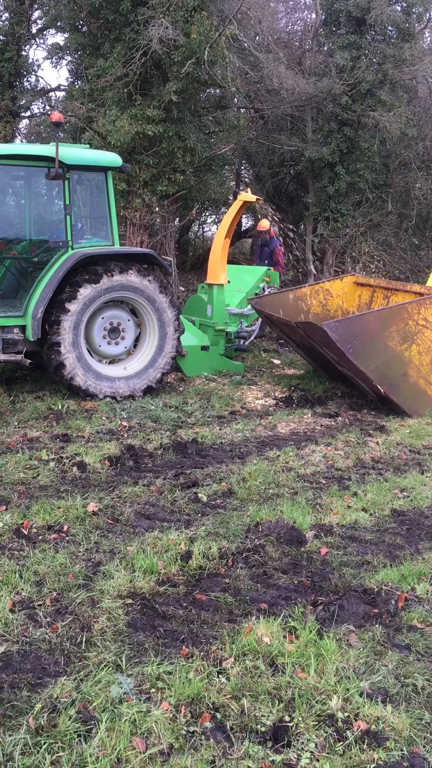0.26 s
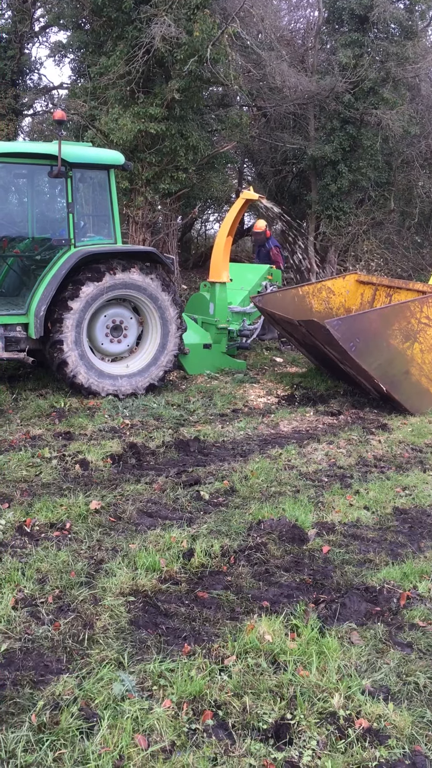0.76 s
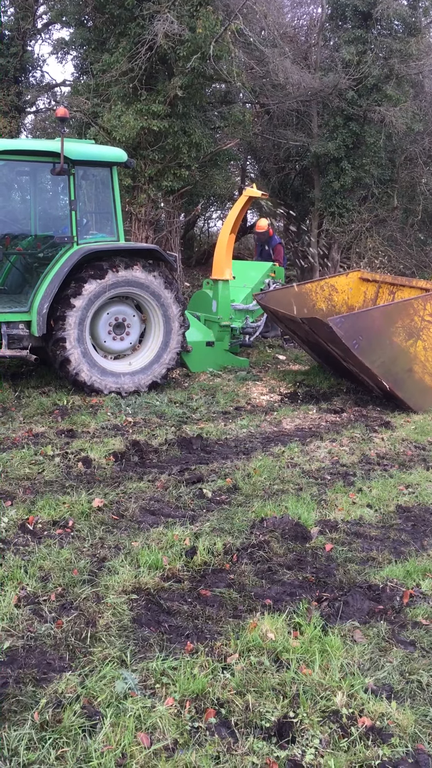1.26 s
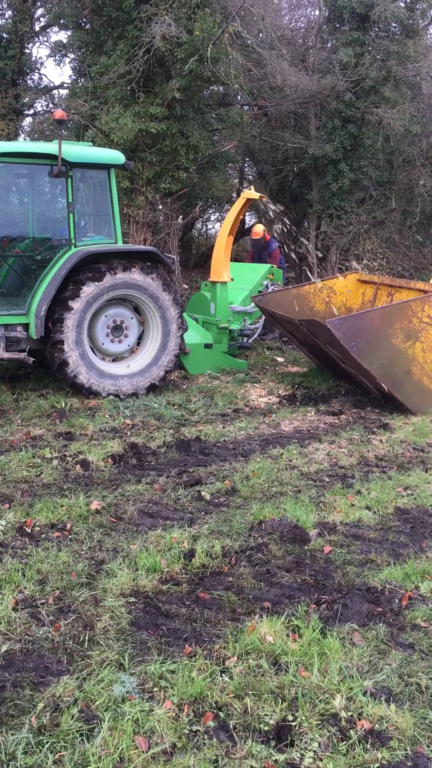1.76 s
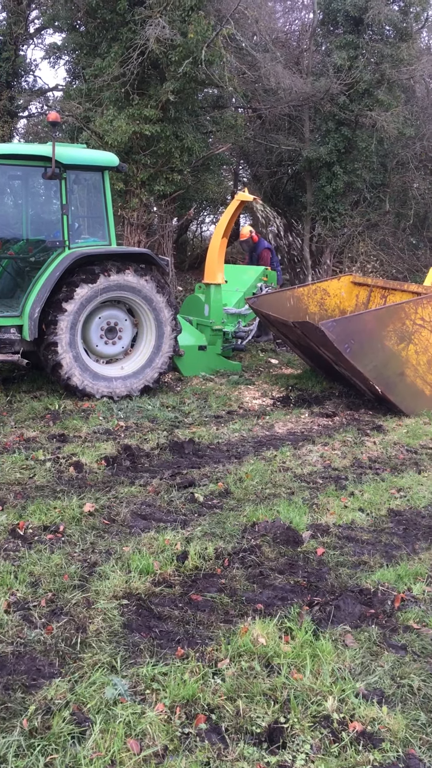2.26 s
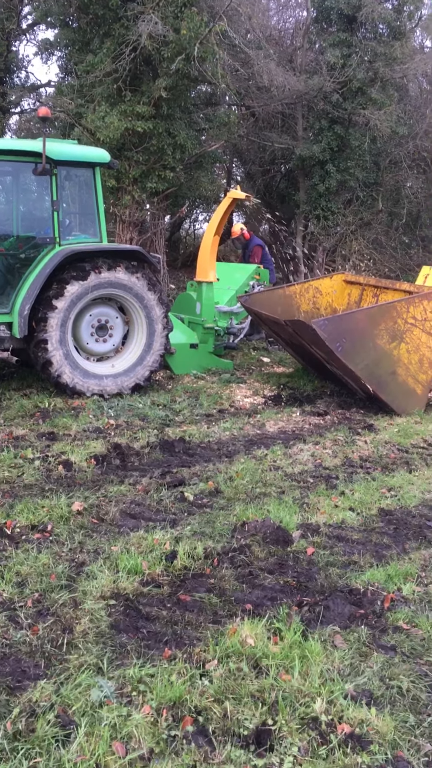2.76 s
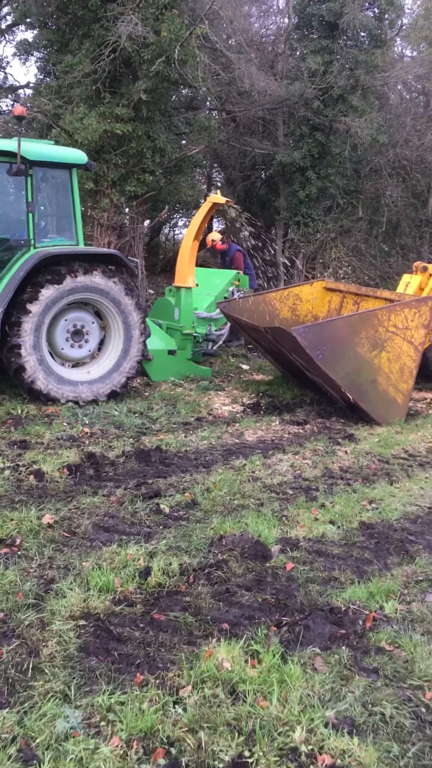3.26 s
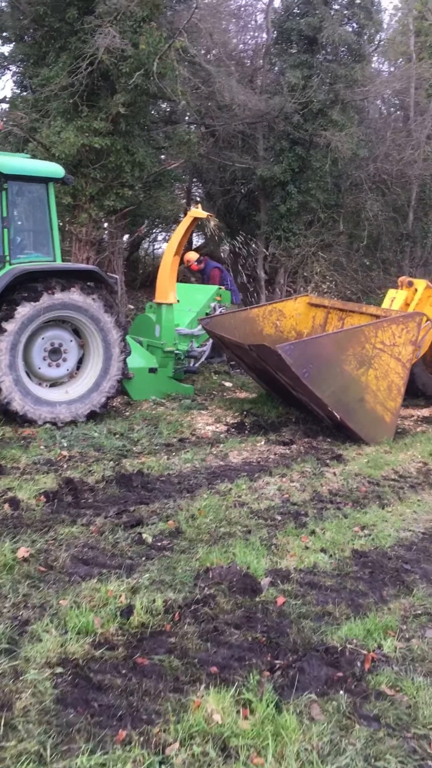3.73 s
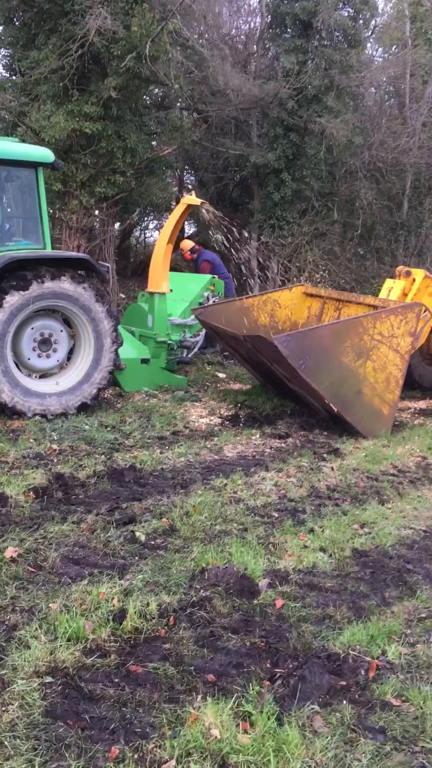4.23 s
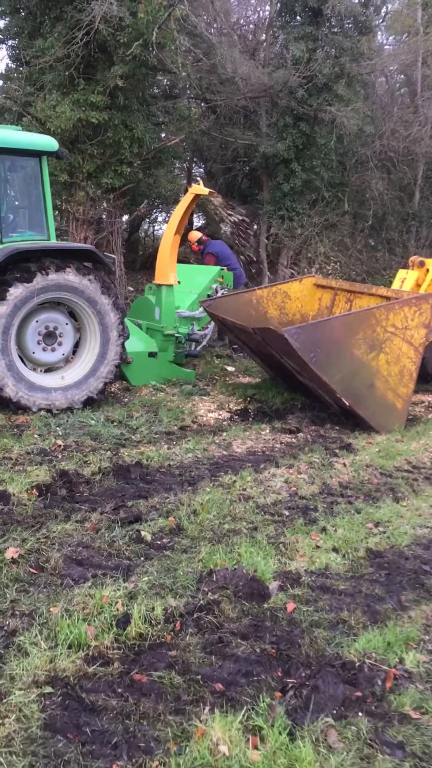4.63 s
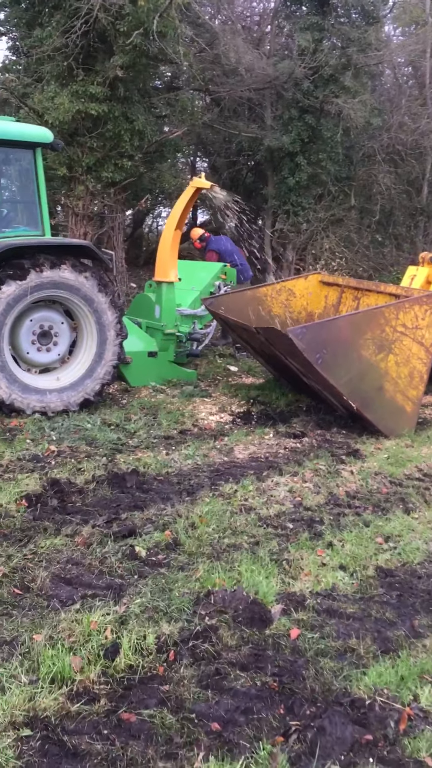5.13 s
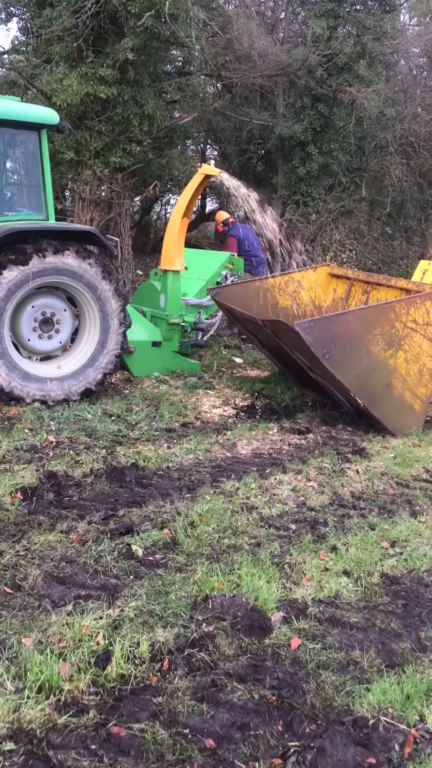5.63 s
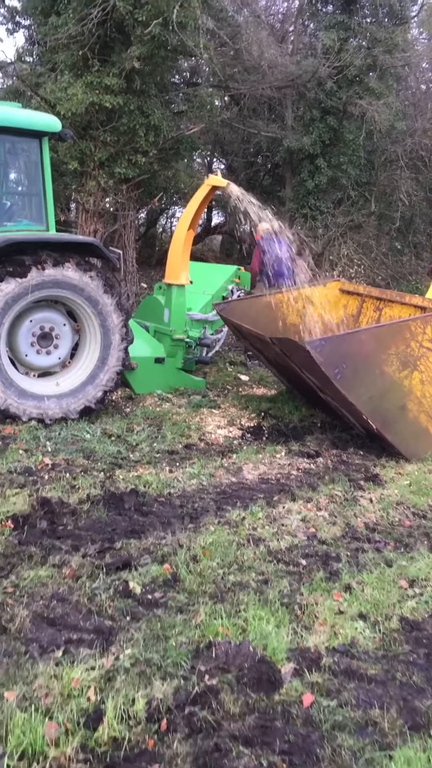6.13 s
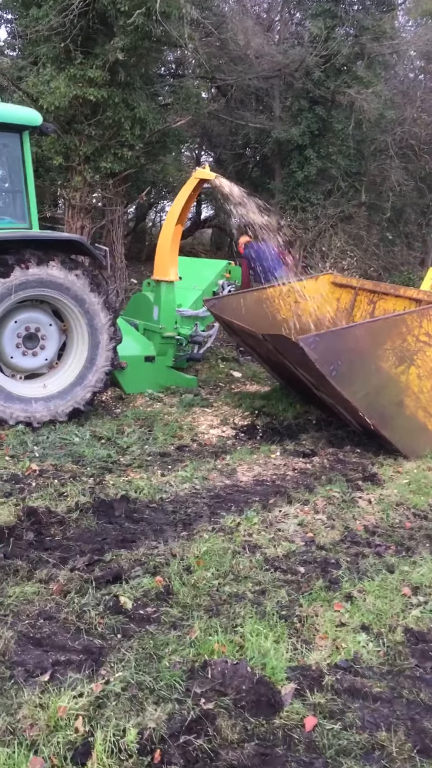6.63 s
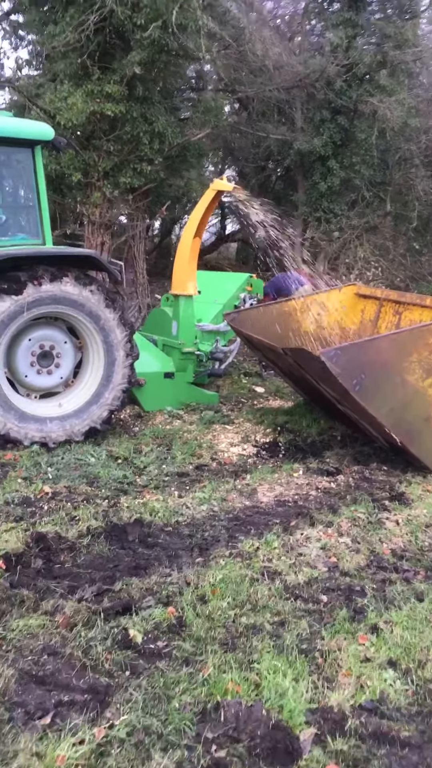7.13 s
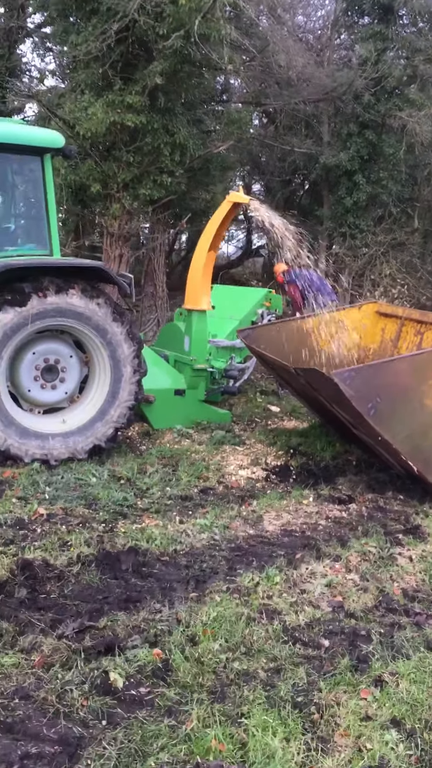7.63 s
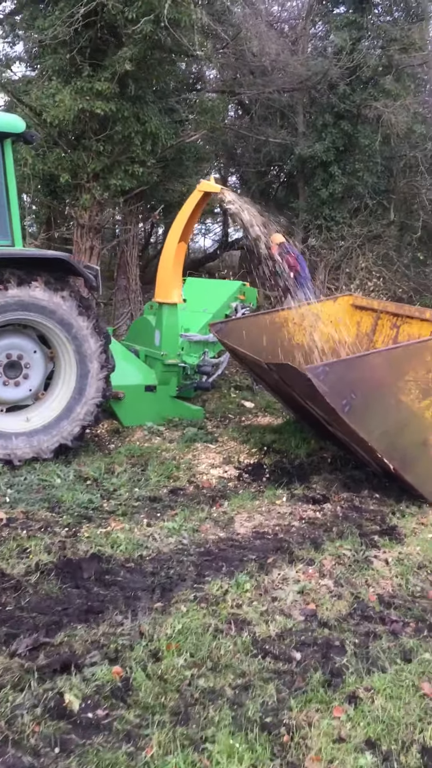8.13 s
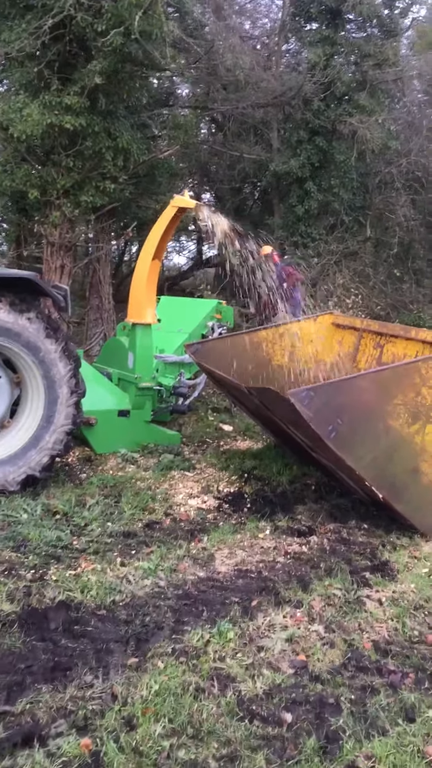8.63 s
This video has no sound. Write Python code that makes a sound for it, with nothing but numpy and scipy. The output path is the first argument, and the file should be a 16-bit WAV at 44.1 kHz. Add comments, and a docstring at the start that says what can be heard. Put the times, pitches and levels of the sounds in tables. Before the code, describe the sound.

A constant, loud diesel drone at fast working speed fills a field, heard in mono from some metres away with little echo. First come leafy hiss, dry twig cracks and a short stick being cut. In the second half, thick branches bring a rough pulsing growl, hollow housing knocks, wavering metallic whines and dense rattling spray of chips, almost unbroken until the last butt clears and the drone is left alone.

```python
"""Tractor and disc chipper

A four-cylinder diesel drives a disc chipper at almost steady speed: exhaust harmonics drone over block clatter
and the noise of turbulent air. Leaves hiss as tiny impacts, and twigs snap as decaying bursts of bright noise.
When sticks and then branches go in, the engine sags, the knives throb as pulsed noise through resonances,
thin tones sing, and showers of impacts rattle and spray through the steel chute."""
import sys
import numpy as np
from scipy import signal
from scipy.fft import rfft, irfft
from scipy.io import wavfile
from scipy.ndimage import uniform_filter1d

SR = 44100
rng = np.random.default_rng(int(sys.argv[2]) if len(sys.argv) > 2 else 0)


def waveform_to_disk(signal):
    """Save audio, clipped to [-1, 1], as 16-bit WAV at the path in sys.argv[1]."""
    frames = np.transpose(np.atleast_2d(signal))
    scaled = np.clip(frames, -1, 1) * 32767
    samples = np.round(scaled).astype(np.int16)
    wavfile.write(sys.argv[1], SR, samples)


N = 392049
TIME, BINS = np.arange(N) / SR, np.fft.rfftfreq(N, 1 / SR)  # s, Hz

FREE_HZ, LOADED_HZ = 64.731, 64.03  # firing rate running free and at full strain
KNIFE_PASSES = 2.083  # knife passes per four-stroke cycle
FLYWHEEL_S = .15  # time constant by which the speed trails the strain
BITE_S = .08  # time for the knives to bite fully into the wood, and to come clear of it
PIPE_S = .0237  # travel time of the firing waves from cylinders to listener
THROW_S = .019  # travel time of the chips out of the disc housing
EDGE_HZ = 15800  # upper band limit


def gain_of(db):
    """Level to amplitude: 20 dB is a factor of ten."""
    return 10 ** (np.asarray(db) / 20)


def evened(x):
    """Normalisation: scales a signal to rms 1."""
    return x / np.sqrt(np.mean(abs(x) ** 2) + 1e-20)


def read(points, hz):
    """Spectral envelope: gain interpolated in dB along a log-frequency axis."""
    f, db = np.transpose(points)
    return gain_of(np.interp(np.log(hz + 1), np.log(f), db))


def coloured(x, points):
    """Linear filtering: multiplies the spectrum of x by an envelope."""
    return irfft(rfft(x) * read(points, BINS), N)


def drift(hz):
    """Slow random modulation: Gaussian low-passed noise of rms 1, up to about hz."""
    lowpass = np.exp(-(BINS / hz) ** 2)
    return evened(irfft(rfft(rng.standard_normal(N)) * lowpass, N))


def strokes(turns, rise, fall, base):
    """Periodic amplitude modulation: a pulse each turn over a steady base; rise and fall in turns."""
    part = turns % 1
    shape = (1 - np.exp(-part / rise)) ** 2 * np.exp(-part / fall)
    return evened(base + shape / shape.max())


def grains(per_s, spread_db):
    """Shot noise: random tiny impacts of either sign, a few of them large."""
    size = gain_of(spread_db * np.minimum(rng.exponential(1, N), 4))
    strikes = rng.random(N) < per_s / SR
    return evened(size * rng.choice([-1, 1], N) * strikes)


def spells(rows, ramp_s):
    """Linear envelopes: each row (start, end, ..) rises, holds at 1 and falls."""
    return np.array([
        np.clip(np.minimum(TIME - start, end - TIME) / ramp_s, 0, 1) for start, end, *_ in rows
    ])


def firing_rate(strain):
    """Governor droop: speed falls in proportion to strain, smoothed by flywheel inertia."""
    keep = np.exp(-1 / (FLYWHEEL_S * SR))
    smooth_strain = signal.lfilter([1 - keep], [1, -keep], strain)
    return FREE_HZ - (FREE_HZ - LOADED_HZ) * smooth_strain


# Exhaust harmonics; every fourth is a multiple of the firing rate
# order [multiples of the four-stroke cycle], free_db [dB rms], loaded_db [dB rms]
EXHAUST_LINES = [(3, -47, -47), (4, -15.1, -15.7), (5, -45, -44), (6, -39, -37), (7, -29, -29),
                 (8, -18, -17.5), (9, -41, -43), (10, -40, -35), (11, -27.5, -31), (12, -31, -36),
                 (13, -37, -41), (14, -41, -40), (15, -35, -37), (17, -46, -45), (19, -42, -41)]


def exhaust(cycle, load, pipe_lag=.615, smear=-.0174, waver=.018, wobble=.16):
    """Harmonic synthesis: weaker waves from unequal cylinders spread over the cycle and wobble in phase."""
    # pipe_lag and smear in turns, wobble in radians rms, waver as a fraction rms
    out = np.zeros(N)
    unsteady = wobble * drift(9.2)
    for order, free_db, loaded_db in EXHAUST_LINES:
        weak = order % 4 > 0
        turns = order * cycle + pipe_lag + weak * smear * order ** 2
        angle = 2 * np.pi * turns + weak * unsteady
        out += gain_of(free_db + (loaded_db - free_db) * load) * np.cos(angle)
    return np.sqrt(2) * out * (1 + waver * drift(17.4))


# Dense comb of engine block lines, running free and under load, before each line's random strength
# frequency_hz [Hz], level_db [dB per line]
CLATTER_FREE_SPECTRUM = [(200, -51), (370, -58), (450, -48.5), (620, -42), (800, -49), (1000, -43.5),
                         (1300, -48.5), (1700, -49.5), (2200, -55.5), (3200, -58), (4500, -66)]
CLATTER_LOADED_SPECTRUM = [(200, -49), (370, -54), (470, -46.5), (620, -43.5), (800, -49), (1000, -47),
                           (1400, -45.5), (1700, -48.5), (2200, -53.5), (3200, -58.5), (4500, -66)]
# Prominent lines of block, fan and gears
# order [multiples of the four-stroke cycle], free_db [dB rms], loaded_db [dB rms]
WHINE_LINES = [(32, -42, -38), (33, -43, -37), (34, -33, -46), (39, -36, -38), (41, -36, -39),
               (42, -39, -45), (43, -39, -48), (59, -41, -45), (61, -41, -44), (64, -39, -41),
               (65, -40, -47), (68, -42, -38), (80, -46, -41), (83, -39, -48), (86, -47, -39),
               (96, -41, -46), (106, -43, -42), (115, -52, -44), (140, -44, -56)]


def clatter(cycle, knock, spectrum, whines, count=6):
    """Periodicity gives a line spectrum: knocks, valves and gears repeat one pattern each cycle."""
    size = len(knock)
    place, order = np.arange(size) / size, np.arange(size // 2 + 1)
    strength = read(spectrum, order * FREE_HZ / 4)
    strength *= np.sqrt(rng.gamma(2, 1 / 2, len(order)))
    # the exhaust sounds its own orders separately
    strength[[0, 1, 2] + [row[0] for row in EXHAUST_LINES]] = 0
    strength[[row[0] for row in WHINE_LINES]] = gain_of(whines)
    firings = strokes(4 * place, rise=0.1525, fall=0.353, base=1.188)
    # alternately impose equal loudness at each firing and the line strengths
    for _ in range(count):
        loudness = np.sqrt(uniform_filter1d(knock ** 2, size=200, mode="wrap"))
        phase = np.angle(rfft(knock / loudness * firings))
        knock = irfft(strength * np.exp(1j * phase))
    return np.interp(cycle, place, knock * size / np.sqrt(2), period=1)


# Turbulence of exhaust, cooling fan and blower
# frequency_hz [Hz], density_db [dB per Hz]
ROAR_SPECTRUM = [(22, -84), (40, -70.5), (72, -60), (120, -54.5), (185, -52), (265, -61.5), (370, -69),
                 (480, -62.5), (620, -58), (800, -63), (1200, -61), (2100, -64), (3200, -68), (5000, -76.5)]


def roar(cycle):
    """Turbulence noise: broadband air noise, modulated a little at each firing."""
    puffs = strokes(4 * cycle, rise=0.144, fall=.35, base=5.2)
    return coloured(rng.standard_normal(N) * puffs, ROAR_SPECTRUM) * np.sqrt(SR / 2)


def tumbled(x, coarse_db, patchy_db=2.5, rasp_hz=5500, rasp_width_hz=2000):
    """Time-varying filtering: clumps strike the steel with their own colour; coarse ones add a lower rasp."""
    hz, s, z = signal.stft(x, SR, nperseg=512, noverlap=384)
    patches = uniform_filter1d(rng.standard_normal(z.shape), size=6, axis=0)  # across frequency
    patches = evened(uniform_filter1d(patches, size=7, axis=1))  # across time
    rasp_band = np.exp(-((hz[:, None] - rasp_hz) / rasp_width_hz) ** 2)
    rasp = rasp_band * np.interp(s, TIME, coarse_db)
    return signal.istft(z * gain_of(patchy_db * patches + rasp), SR, nperseg=512, noverlap=384)[1][:N]


# Colours of leaf and chip impacts
# frequency_hz [Hz], relative_level_db [dB]
LEAF_SPECTRUM = [(2000, -14.5), (3500, -4), (6000, 2), (7600, -5), (9500, -2), (12500, 1), (14500, 0),
                 (15800, 0)]
CHIP_SPECTRUM = [(2000, -11), (4000, -7.5), (6200, 1.5), (7300, -2), (9200, 2.5), (11500, -1.5), (13000, 0),
                 (15800, -7)]
# Leafy sprigs drawn through the blower; levels before load, patches and gusts
# start_s [s], end_s [s], hiss_db [dB], rasp_db [dB]
SPRIG_SPELLS = [(-0.1, 0.62, -34.5, 0), (0.36, 0.53, -32, -3), (0.63, 0.86, -27.5, -3),
                (1.15, 3.1, -34.5, 0), (1.4, 1.6, -34, -2), (3.42, 4.05, -33.5, 0), (4.0, 5.0, -31, 1),
                (6.6, 7.05, -35.5, -1)]


def spray(knife, load, chip_flow, chip_rasp_db, litter_db=-33.8, sprig_ramp_s=.07, gust_db=0.69):
    """Filtered shot noise: leaves hiss through the blower; hard chips leave in a burst per knife."""
    leaf_pulse = strokes(knife, rise=0.14, fall=0.285, base=1.6)
    leaves = evened(coloured(grains(14000, spread_db=2.5), LEAF_SPECTRUM)) * leaf_pulse
    chip_pulse = strokes(knife, rise=0.162, fall=0.236, base=0.677)
    chips = evened(coloured(grains(16000, spread_db=1.9), CHIP_SPECTRUM)) * chip_pulse
    _, _, hiss_db, rasp_db = np.transpose(SPRIG_SPELLS)
    passing = spells(SPRIG_SPELLS, sprig_ramp_s)
    # litter and sprigs add in power, and give way as the load grows
    leaf_power = gain_of(litter_db) ** 2 + gain_of(hiss_db) ** 2 @ passing
    leaf_flow = np.sqrt((1 - load) * leaf_power)
    stream = leaf_flow * leaves + chip_flow * chips
    return gain_of(gust_db * drift(26)) * tumbled(stream, rasp_db @ passing + chip_rasp_db)


# Twigs snapping
# start_s [s], relative_level_db [dB], decay_s [s to -60 dB]
TWIG_SNAPS = [(.7386, -19, .04), (.793, -17, .06), (.9772, -18, .04), (1.2542, -10.5, .05),
              (1.4801, -8.5, .016), (1.4958, -20, .05)]
# Colour of a snap: frequency_hz [Hz], relative_level_db [dB]
SNAP_SPECTRUM = [(2000, -24.5), (4500, -16.5), (6000, -9), (9000, -3.5), (12500, 0.5), (15800, -0.5)]


def snaps(snap_db=2):
    """Exponential decay: each twig breaks in a bright noise burst of tearing fibres."""
    envelope = np.zeros(N)
    for s, db, t60 in TWIG_SNAPS:
        age = np.maximum(TIME - s, 0)
        envelope += (TIME >= s) * gain_of(db - 60 * age / t60)
    return gain_of(snap_db) * coloured(envelope * rng.standard_normal(N), SNAP_SPECTRUM)


# Colours of the knife blows and of chips rattling in the chute
# frequency_hz [Hz], relative_level_db [dB]
THUD_SPECTRUM = [(60, -19.5), (110, 0.5), (200, 5.5), (290, 2.5), (370, -5.5), (450, 1), (600, 0),
                 (800, -1.5), (1500, -12.5), (4000, -35)]
RATTLE_SPECTRUM = [(500, -21.5), (900, -4.5), (1400, -1.5), (2000, -2.5), (3000, -8.5), (4500, -14),
                   (8000, -30.5)]


def cutting(knife, load, rattle, thud_db=-33, hum_db=-28):
    """Periodic forcing: under load the knives thud and the paddles hum, while chips rattle in the chute."""
    pulse = strokes(knife, rise=0.077, fall=0.29, base=1.14)
    blows = evened(coloured(rng.standard_normal(N) * pulse, THUD_SPECTRUM))
    hail = evened(coloured(grains(7000, spread_db=2), RATTLE_SPECTRUM))
    hum = np.sqrt(2) * np.cos(2 * np.pi * 3 * knife)  # third harmonic of the knife rate
    return np.sqrt(load) * (gain_of(thud_db) * blows + gain_of(hum_db) * hum) + rattle * hail


# Resonances of the hopper and disc housing
# frequency_hz [Hz], width_hz [Hz], relative_level_db [dB]
HOUSING_MODES = [(285, 35, -3), (455, 55, -1), (562.7, 70, -2.5), (800, 118, 0), (1140, 146, -4)]
# Thick stretches of the branches
# start_s [s], end_s [s], boom_db [dB]
THICK_STRETCHES = [(4.85, 5.32, -33), (6.15, 6.85, -39), (7.3, 8.1, -31), (8.0, 8.55, -31.5),
                   (8.4, 9.2, -29)]


def knocking(knife, load, uneven_db=3, plain_db=-41, knot_ramp_s=.17):
    """Modal resonance: uneven knife bites excite the housing, which booms most where the wood is thick."""
    bite = np.floor(knife).astype(int)
    force = gain_of(uneven_db * np.clip(rng.standard_normal(N), -2, 2))[bite]
    pulse = strokes(knife, rise=.05, fall=0.265, base=0.335)
    blows = force * pulse * rng.standard_normal(N)
    body = sum(
        gain_of(db) / np.sqrt(width) / (1 + 1j * (BINS - hz) / width) ** 2
        for hz, width, db in HOUSING_MODES
    )
    _, _, boom_db = np.transpose(THICK_STRETCHES)
    thick_power = gain_of(boom_db) ** 2 @ spells(THICK_STRETCHES, knot_ramp_s)
    power = gain_of(plain_db) ** 2 * load + thick_power
    return np.sqrt(power) * evened(irfft(rfft(blows) * body, N))


# Thin tones that the chipper sings under load
# start_s [s], end_s [s], pitch_hz [Hz], level_db [dB rms at full swell, before flutter]
SINGING_TONES = [(5.2, 6.1, 3540, -48.5), (5.85, 6.955, 3397, -38.5), (6.83, 9.4, 3397, -42.5),
                 (6.2, 7.73, 2400, -41), (6.5, 8.2, 1450, -36.5), (7.55, 9.2, 1845, -42.5),
                 (5.1, 7.61, 1378, -39.5)]


def singing(fade=0.264, wander_hz=5, flutter=0.26):
    """Frequency and amplitude modulation: thin tones swell and fade, wavering in pitch and strength."""
    out = np.zeros(N)
    for (_, _, hz, db), swell in zip(SINGING_TONES, spells(SINGING_TONES, fade)):
        turns = np.cumsum(hz + wander_hz * drift(25.03)) / SR
        strength = gain_of(db) * np.sqrt(2 * swell) * (1 + flutter * drift(30))
        out += strength * np.sin(2 * np.pi * turns)
    return out


# Wood fed to the knives: two sticks, two branches and the butt of the last; chips_db before patches and gusts
# start_s [s], end_s [s], strain [0-1], rattle_db [dB], chips_db [dB], rasp_db [dB]
WOOD_FEED = [(2.27, 2.6, .58, -36, -39, 0), (4.03, 4.35, .2, -44, -34, 0),
             (4.92, 6.75, .98, -32.5, -26.1, 1), (6.95, 8.28, .96, -30.5, -26.2, -2.5),
             (8.2, 9.2, .95, -28.7, -27.1, -3)]


def scene():
    """Coupled rotation: one shaft turns engine and disc; wood slows it, alters its note and throws chips."""
    _, _, strains, rattle_db, chips_db, rasp_db = np.transpose(WOOD_FEED)
    feeding = spells(WOOD_FEED, BITE_S)
    strain = np.clip(strains @ feeding, 0, 1)
    load = strain ** 2
    cycle_hz = firing_rate(strain) / 4  # four firings per cycle
    cycle = np.cumsum(cycle_hz) / SR
    knife = KNIFE_PASSES * cycle

    knock = rng.standard_normal(size=2048)
    _, free_db, loaded_db = np.transpose(WHINE_LINES)
    free_block = clatter(cycle, knock, CLATTER_FREE_SPECTRUM, free_db)
    loaded_block = clatter(cycle, knock, CLATTER_LOADED_SPECTRUM, loaded_db)
    block = (1 - load) * free_block + load * loaded_block
    tractor = exhaust(cycle - PIPE_S * cycle_hz, load) + block + roar(cycle)

    rattle = gain_of(rattle_db) @ feeding
    chipper = cutting(knife, load, rattle) + knocking(knife, load) + singing()
    thrown_knife = knife - THROW_S * KNIFE_PASSES * cycle_hz
    thrown = spray(thrown_knife, load, gain_of(chips_db) @ feeding, rasp_db @ feeding)
    return (tractor + chipper + thrown + snaps())[None]


# Narrow dips in the treble
# frequency_hz [Hz], width_hz [Hz from centre to 1/e of depth], depth_db [dB]
TREBLE_DIPS = [(4915, 247, 4.5), (10470, 256, 6)]


def record(dry):
    """Band limitation: narrow treble dips, then a linear-phase low-pass filter."""
    dips_db = sum(depth * np.exp(-((BINS - hz) / width) ** 2) for hz, width, depth in TREBLE_DIPS)
    heard = irfft(rfft(dry) * gain_of(-dips_db), N)
    lowpass = signal.firwin(511, EDGE_HZ, window=("kaiser", 9), fs=SR)
    return signal.oaconvolve(heard, lowpass[None], "same")


dry = scene()
out = record(dry)
waveform_to_disk(out)
```